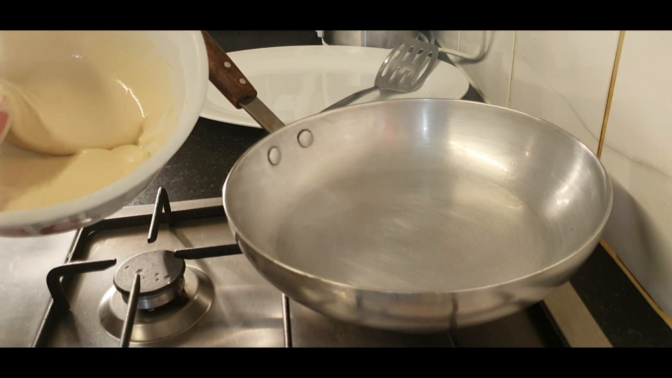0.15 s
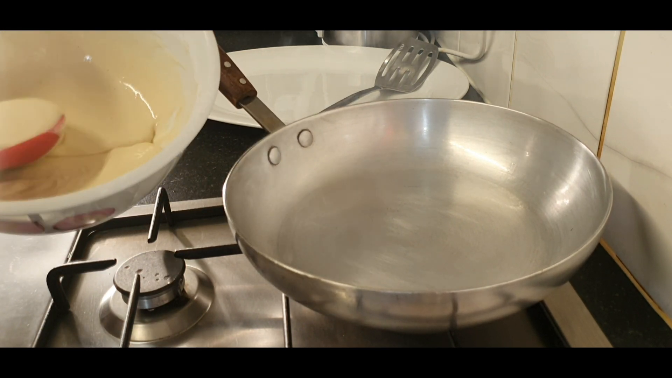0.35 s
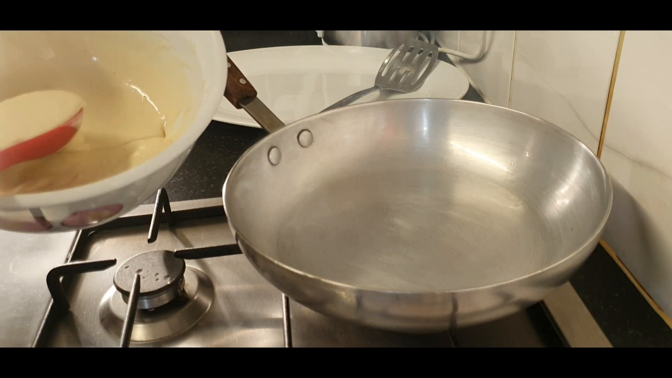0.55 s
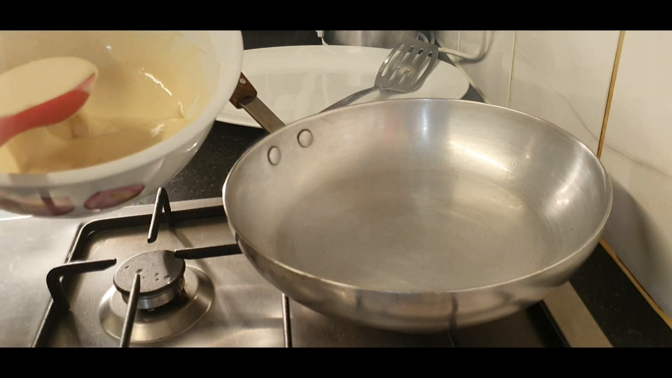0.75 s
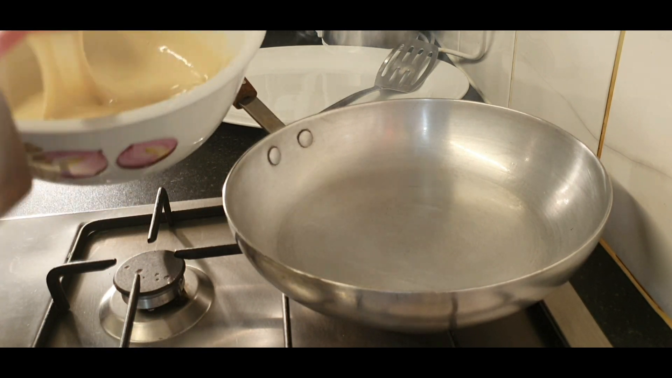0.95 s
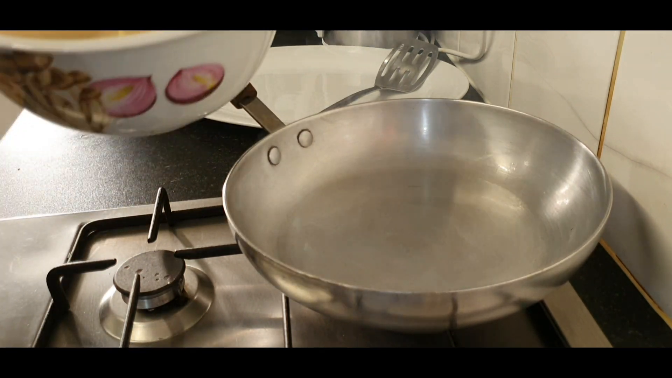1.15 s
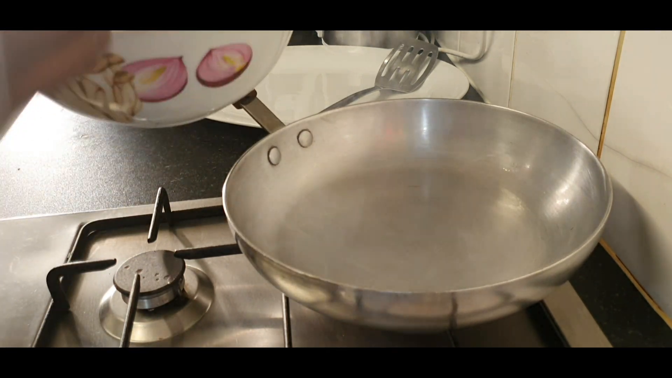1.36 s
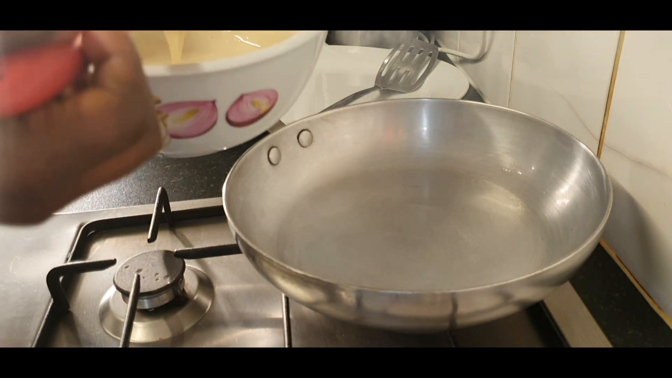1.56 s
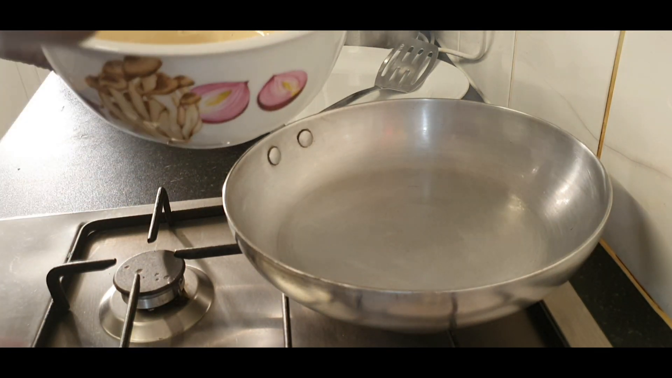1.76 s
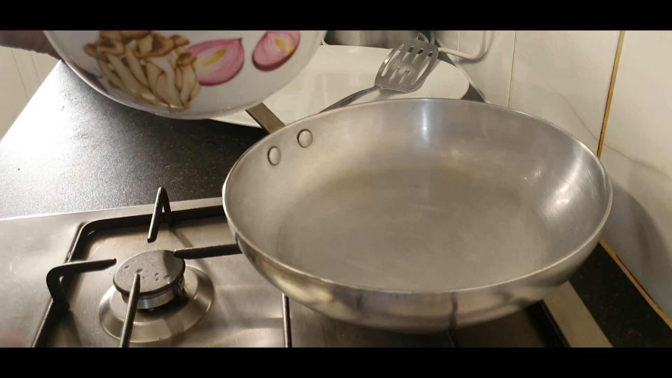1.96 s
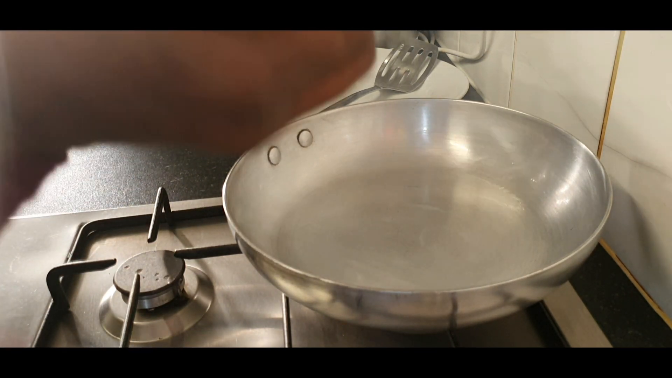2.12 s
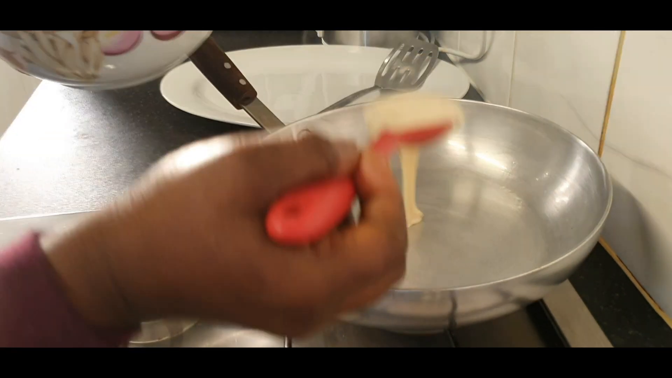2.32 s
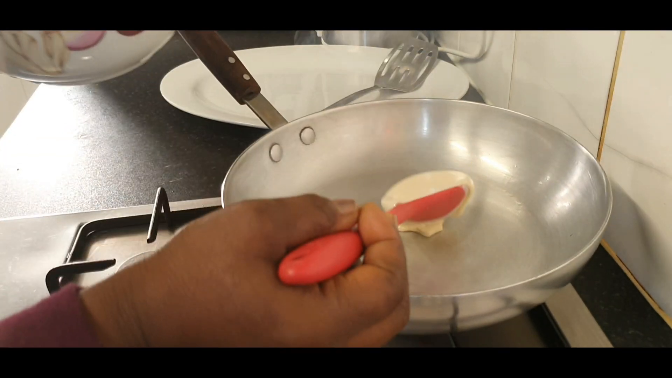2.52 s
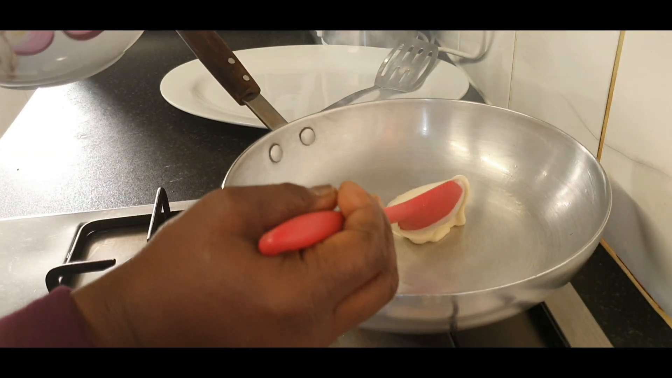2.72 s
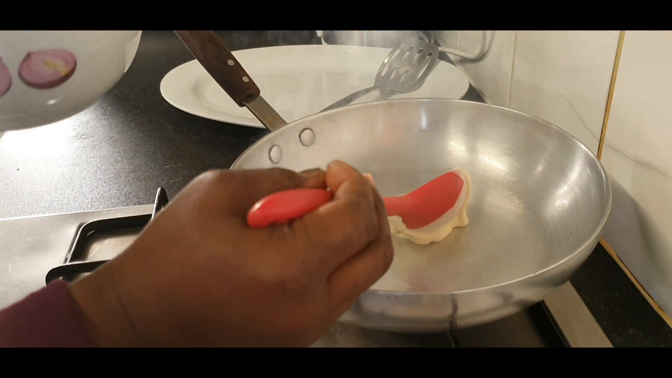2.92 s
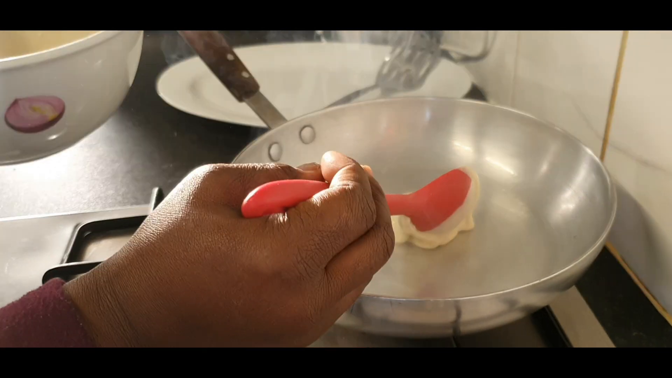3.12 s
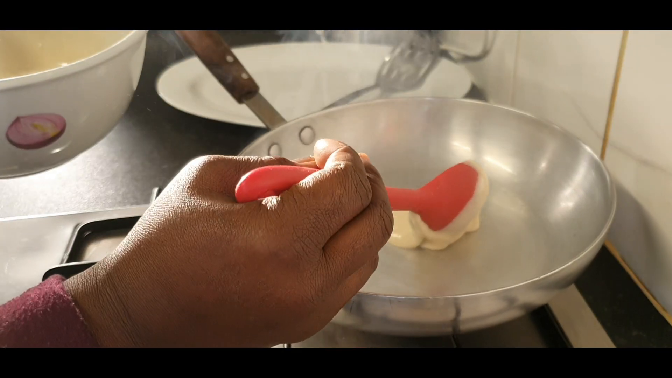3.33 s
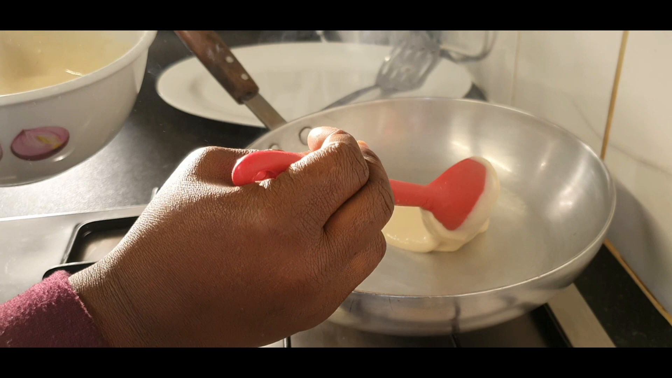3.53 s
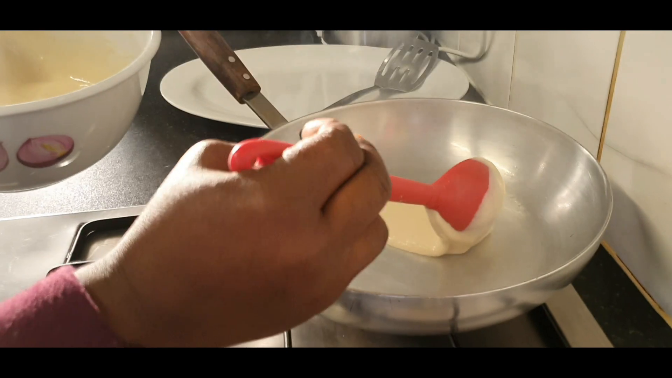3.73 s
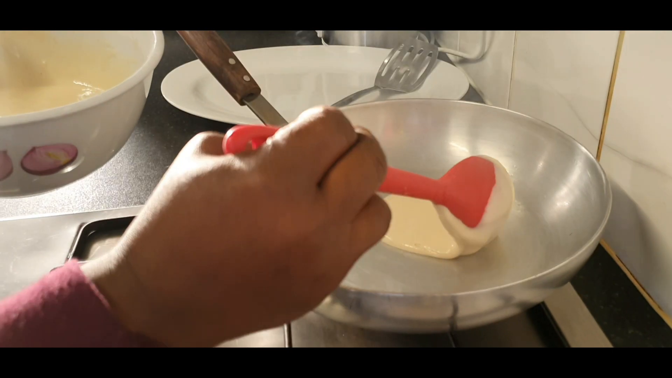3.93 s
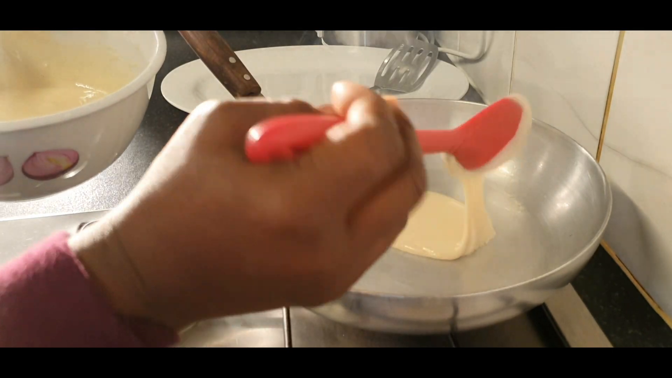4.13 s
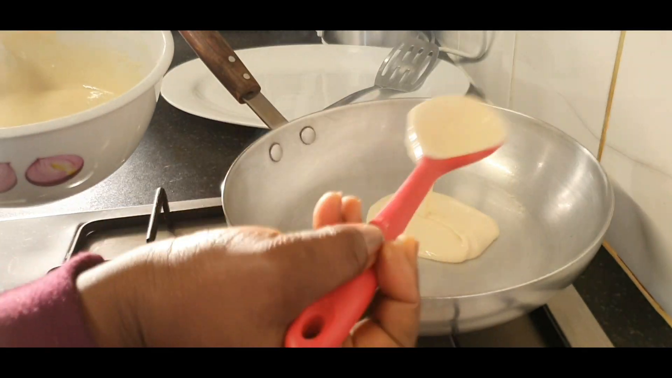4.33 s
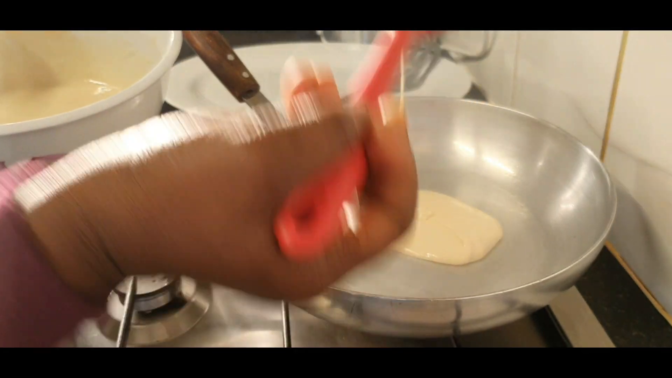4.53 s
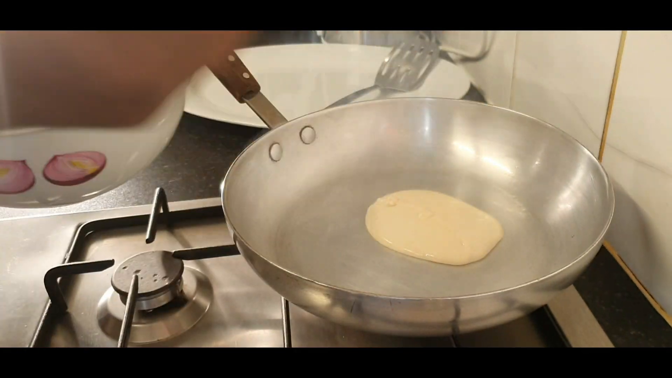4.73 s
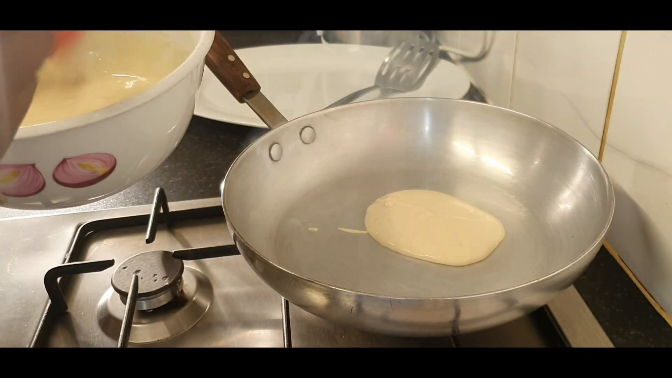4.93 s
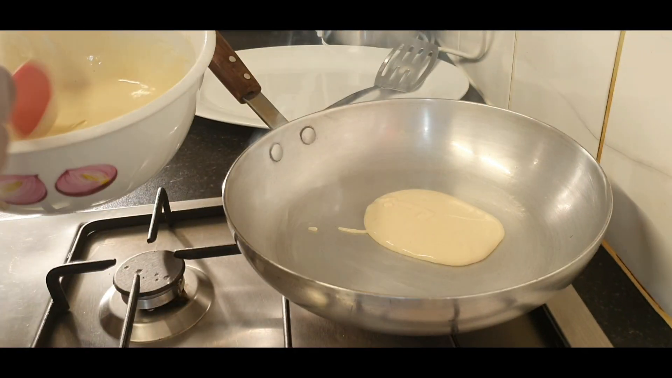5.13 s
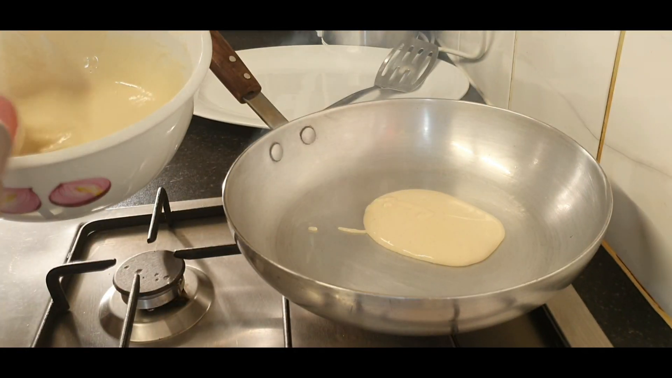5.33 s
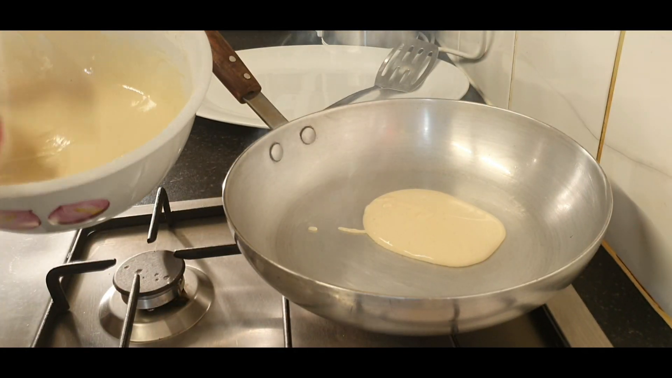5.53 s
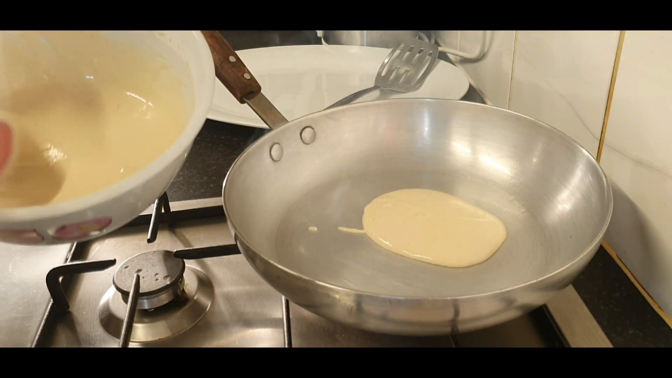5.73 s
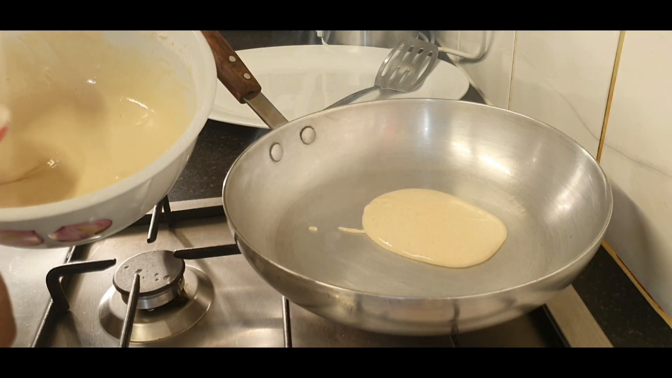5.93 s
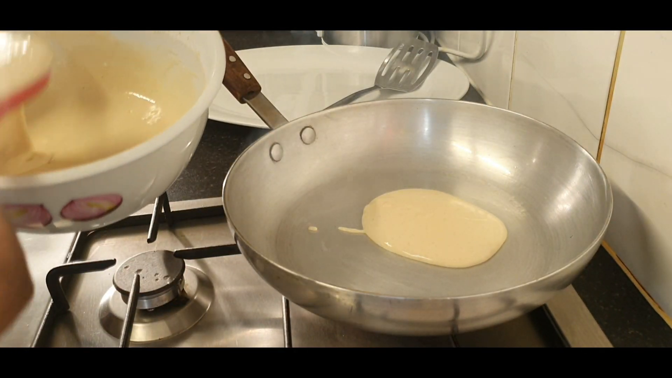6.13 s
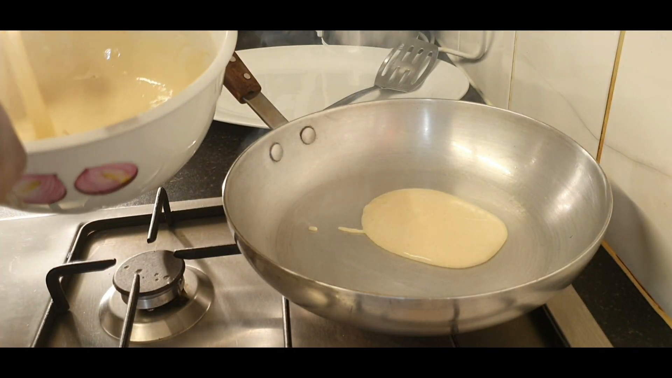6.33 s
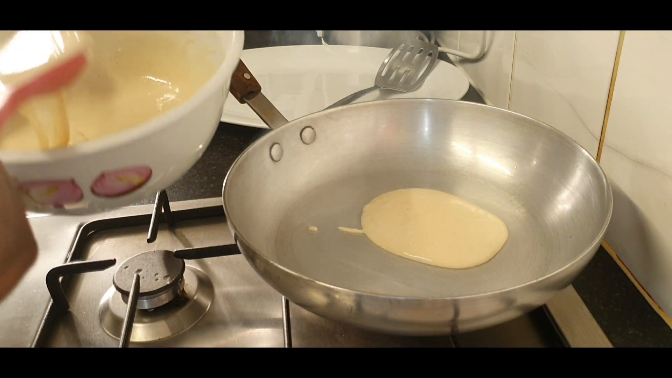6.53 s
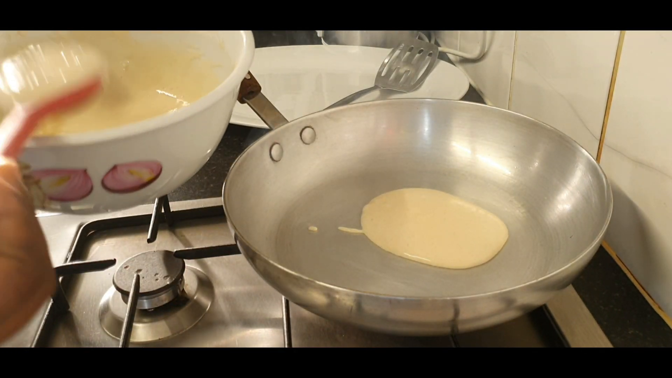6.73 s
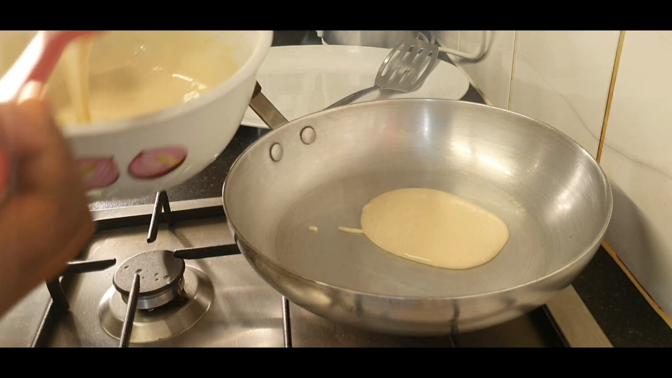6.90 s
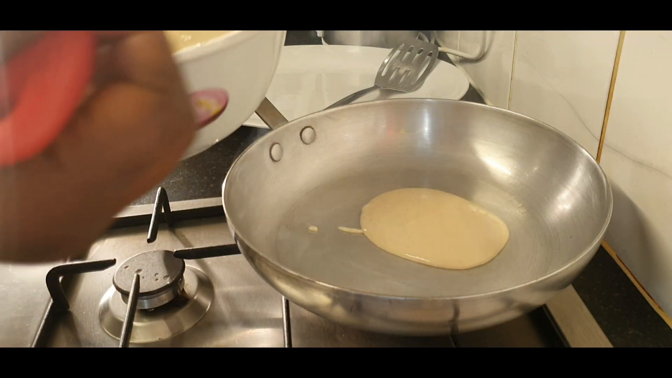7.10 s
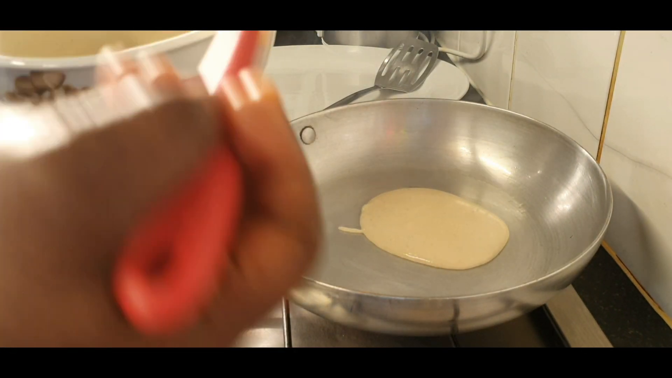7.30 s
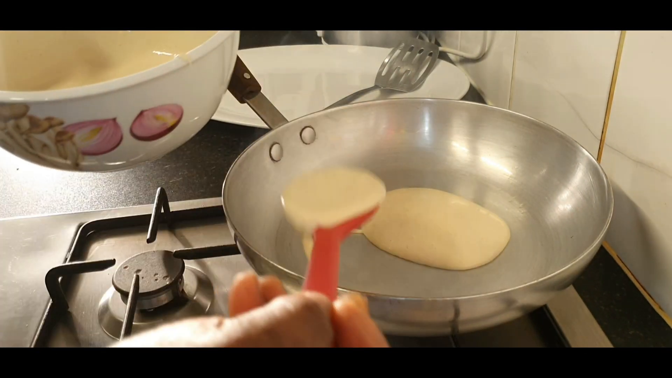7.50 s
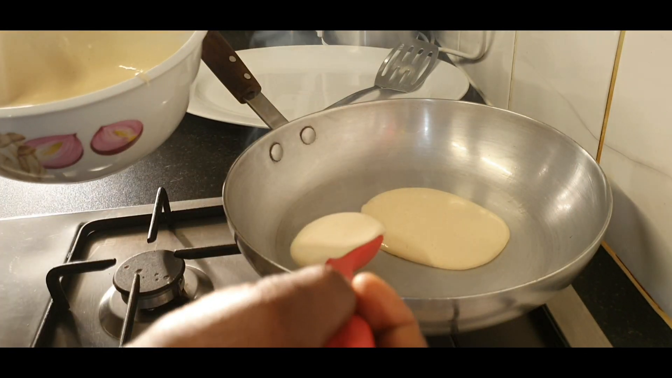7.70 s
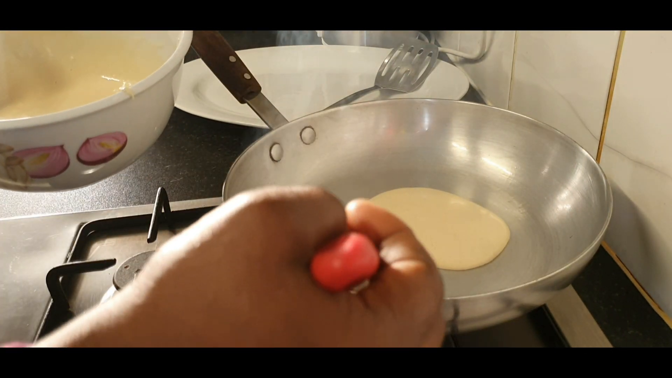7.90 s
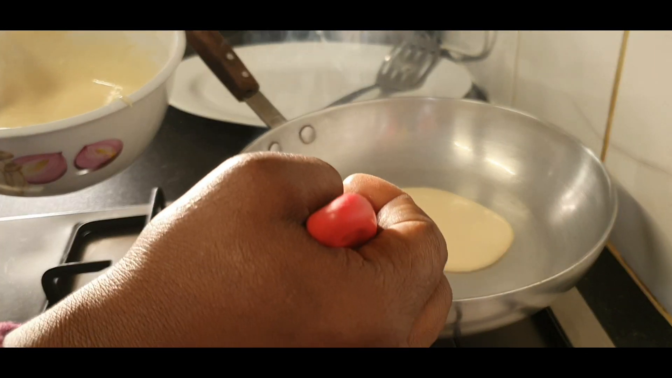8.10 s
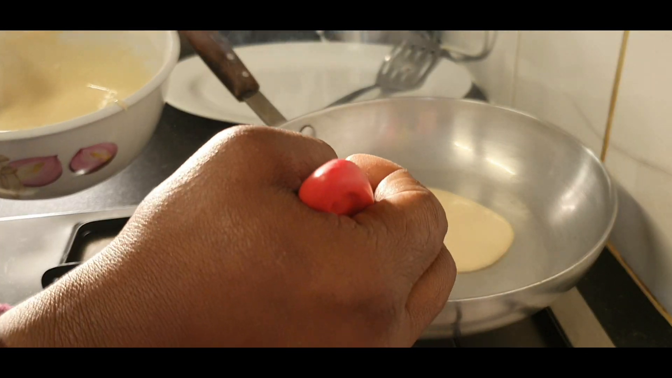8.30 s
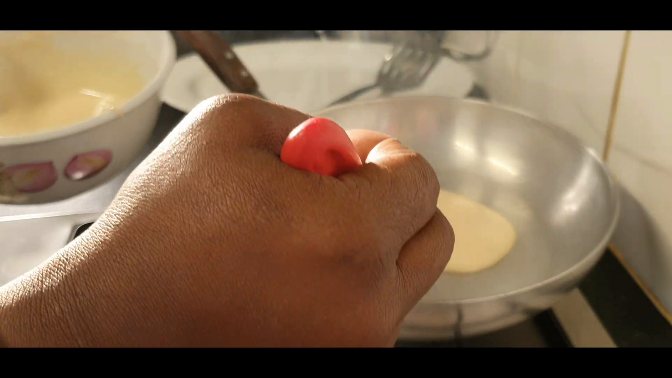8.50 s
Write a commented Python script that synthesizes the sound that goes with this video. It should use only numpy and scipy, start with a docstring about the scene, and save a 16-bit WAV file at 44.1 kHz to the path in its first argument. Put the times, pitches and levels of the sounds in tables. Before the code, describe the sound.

A small kitchen, heard close in stereo with brief wall reflections. A very quiet gas flame murmurs throughout, its low rumble sinking after 7 s. In the first 0.4 s a ladle gives faint clicks and a soft bowl thump. At about 2.33 s it lands on a hot steel pan in a rapid cluster of short metallic knocks, with low grate thuds and a brief gritty scrape until 2.65 s. Batter starts sizzling, swelling by 2.9 s into bright, dense hiss and wet crackle, then calming, with a dip near 4.1 s. Faint dull plops fall from 3.7 to 4.9 s. The ladle bumps the bowl at 5.05 s, clicks at 5.5 and 5.7 s, then makes two deep, muffled, prominent thumps at 6.5 and 6.8 s. At 7.54 s a second pour sizzles, flaring around 7.9-8.1 s before easing towards the end.

```python
"""A gas flame murmurs under a small kitchen: filtered noise that flickers, its bass sinking near the end.
At first a plastic ladle lightly knocks pan and mixing bowl: decaying modes plus short noise clicks.
Then it lands on a hot steel pan, knocks it against its grate and scrapes; the poured batter sizzles,
a crowd of random steam bursts that slowly calms. Dull plops follow, then the ladle bumps the bowl,
through batter and on its bare rim. At last a second pour makes the pan sizzle afresh."""
import sys
import numpy as np
from scipy import signal
from scipy.fft import rfft, irfft
from scipy.io import wavfile

SR = 44100
rng = np.random.default_rng(int(sys.argv[2]) if len(sys.argv) > 2 else 0)


def file_out(sig):
    """Save sig as 16-bit WAV at sys.argv[1]."""
    # one column per channel
    cols = np.atleast_2d(sig).T
    # limit, then scale
    lim = np.clip(cols, -1, 1)
    pcm = np.round(lim * 32767).astype(np.int16)
    wavfile.write(sys.argv[1], SR, pcm)


N = 377319
TIME = np.arange(N) / SR
BLOW_TIME = TIME[:SR * 3 // 4]   # time since a blow [s]
FREQS = np.maximum(np.fft.rfftfreq(N, 1 / SR), 1)


def from_db(db):
    """Decibels to gain."""
    return 10 ** (np.asarray(db) / 20)


def rms_one(x):
    """Scale to unit power."""
    return x / np.sqrt(np.mean(x ** 2) + 1e-20)


def split_db(balance_db):
    """Left and right levels in dB for a left-minus-right difference."""
    return np.array([[.5], [-.5]]) * balance_db


def at_freqs(points):
    """A spectrum table joined by straight lines over log frequency."""
    hz, value = np.transpose(points)
    return np.interp(np.log(FREQS), np.log(hz), value)


def drift(rate_hz):
    """Slow random wander with a spread of about 1, taking new values at the given rate."""
    knots = rng.standard_normal(N // 50)
    wander = np.interp(TIME * rate_hz, np.arange(len(knots)), knots)
    return wander / np.sqrt(2 / 3)   # interpolation had narrowed the spread


def filtered(x, kind, hz, order=2):
    """Causal Butterworth filter."""
    return signal.sosfilt(signal.butter(order, hz, kind, fs=SR, output="sos"), x)


def lowpass(x, hz, order=2):
    """Causal low-pass, kept below the top of the band."""
    return filtered(x, "low", min(hz, .45 * SR), order)


def add(out, s, sound):
    """Mix a short stereo sound in at time s."""
    start = round(s * SR)
    out[:, start:start + sound.shape[-1]] += sound[..., :N - start]


def coloured(pair, spectrum_db):
    """Two unrelated signals become a stereo field of given colour, alike in the bass; mid has rms 1."""
    # likeness of the two sides: (frequency [Hz], left-right correlation [-1 to 1])
    side_likeness = [(100, 0.93), (300, 0.7), (600, 0.38), (1500, 0.17), (4000, 0.14), (8000, 0.041),
                     (15000, 0)]
    alike = np.clip(at_freqs(side_likeness), -.99, .99)
    mid, side = rfft(pair)
    shared = np.sqrt(1 + alike) * mid
    opposed = np.sqrt(1 - alike) * side * [[1], [-1]]
    field = irfft((shared + opposed) * from_db(spectrum_db), N)
    return field / np.std(field.mean(axis=0))


def crack(t60):
    """Stereo noise that dies away: a crowd of modes or reflections."""
    return rng.standard_normal((2, len(BLOW_TIME))) * from_db(-60 * BLOW_TIME / t60)


def click(hz, t60, width):
    """A brief band of decaying noise, as from a hard contact; unit level over its first 5 ms."""
    edges = np.clip([hz / (1 + width), hz * (1 + width)], 20, .45 * SR)
    snap = filtered(crack(t60), "band", edges)
    return snap / np.std(snap[:, :SR // 200])


def ringing(modes, rise_s, spread, uneven=False):
    """One blow on a body; modes reach the two sides out of phase, and an uneven blow favours them by chance."""
    hz, db, t60 = np.transpose(modes)[:, :, None]
    chance_db = uneven * 2 * rng.standard_normal(hz.shape)
    strength = from_db(db + chance_db - 60 * BLOW_TIME / t60)
    skew = spread * (-1) ** np.arange(len(hz))[:, None]   # radians, alternating from mode to mode
    phase = 2 * np.pi * hz * BLOW_TIME
    sides = [(strength * np.sin(phase + sign * skew)).sum(axis=0) for sign in (1, -1)]
    return np.array(sides) * (1 - np.exp(-BLOW_TIME / rise_s))


def bursts(per_s, size_db):
    """Single-sample pops at random times, most tiny and a few large."""
    sizes = from_db(size_db * np.minimum(rng.exponential(1, (2, N)), 5))
    signs = rng.choice([-1, 1], (2, N))
    return sizes * signs * (rng.random((2, N)) < per_s / SR)


def flame(murmur_db, flicker_db):
    """The gas ring is noise: a murmur over a bass rumble that holds, then sinks; both flicker slightly."""
    # colour of the flame's murmur: (frequency [Hz], level [dB])
    murmur_colour = [(150, -5), (240, 2.5), (330, 3.5), (470, -10), (780, 2), (950, -2.5), (1250, -0.5),
                     (1700, -9.5), (2200, -20), (3000, -15.5), (4200, -25), (8200, -25.5), (9200, -38),
                     (15000, -33)]
    # colour of its bass rumble: (frequency [Hz], level [dB])
    rumble_colour = [(20, -16), (40, -30), (52, 9), (80, -4.5), (120, -9), (200, -16), (500, -49.5)]
    rumble_start_db, sinks_from_s, sink_db_per_s = -67.5, 7, 6
    murmur = from_db(murmur_db) * coloured(rng.standard_normal((2, N)), at_freqs(murmur_colour))
    rumble_db = rumble_start_db - sink_db_per_s * np.maximum(TIME - sinks_from_s, 0)
    rumble = from_db(rumble_db) * coloured(rng.standard_normal((2, N)), at_freqs(rumble_colour))
    return (murmur + rumble) * from_db(flicker_db * drift(6.8))


def kitchen(x, tail_db, t60, dull_hz, echo_top_hz, tail_bottom_hz):
    """Long waves come back as distinct wall echoes; shorter ones scatter into a brief tail."""
    # echoes off nearby walls: (delay [s], level [dB])
    wall_echoes = [(.011, -5.5), (.0191, -15), (.0386, -15), (.09, -26)]
    tail = lowpass(crack(t60), dull_hz, order=1)
    tail = tail * (1 - np.exp(-BLOW_TIME / 0.0032))   # the tail builds up within milliseconds
    tail = filtered(tail, "high", tail_bottom_hz)
    tail = from_db(tail_db) * tail / np.sqrt(np.sum(tail ** 2) / 2)
    walls = np.zeros_like(tail)
    for delay, db in wall_echoes:
        add(walls, delay, from_db([db]))
    response = tail + lowpass(walls, echo_top_hz, order=1)
    return x + signal.fftconvolve(x, response, axes=1)[:, :N]


def bowl_knocks(thump_balance_db, click_t60, click_width):
    """Through the batter the ladle only thumps the bowl; on the bare rim it clicks and rings."""
    # thumps through the batter: (time [s], level [dB], contact brightness [Hz])
    batter_thumps = [(.135, -31, 210), (5.886, -29, 380), (6.534, -8, 407), (6.8093, -7.5, 416)]
    # knocks on the bare rim: (time [s], ring level [dB], click level [dB], contact brightness [Hz])
    rim_hits = [(0.042, -66, -45, 5500), (.347, -82, -62.5, 4670), (5.047, -46, -70, 320),
                (5.494, -39.5, -42.5, 3400), (5.704, -42.5, -34, 2580), (5.7164, -36, -30.5, 4640)]
    # modes of the full bowl, the main, heavily damped one first: (frequency [Hz], level [dB], t60 [s])
    full_bowl_modes = [(302, 0, .052), (262, -25, .17), (372, -15, .07), (436, -24, .11), (522, -22, .11),
                       (694, -31, .14), (1080, -28, .05), (1295, -15, .06), (2400, -12, .06)]
    # modes of rim and wall, undamped by batter: (frequency [Hz], level [dB], t60 [s])
    bare_rim_modes = [(120, -12.5, 0.18), (247.2, -2.5, .17), (321, -3, .11), (403, -2, .11), (492, -3, .1),
                      (703, -7.5, 0.14), (763, -8.5, .13), (1080, -5.5, 0.067), (1415, -12, 0.065),
                      (2456, -6.5, .05), (2970, -1.5, .05)]
    out = np.zeros((2, N))
    for s, thump_db, bright_hz in batter_thumps:
        thump = lowpass(ringing(full_bowl_modes, rise_s=0.0096, spread=0.11), bright_hz)
        add(out, s, from_db(thump_db + split_db(thump_balance_db)) * thump)
    for s, ring_db, click_db, bright_hz in rim_hits:
        ring = from_db(ring_db) * lowpass(ringing(bare_rim_modes, rise_s=.002, spread=0.25), bright_hz)
        tick = from_db(click_db) * click(bright_hz, click_t60, click_width)
        add(out, s, ring + tick)
    return out


def plops(hz, t60, width):
    """Blobs of batter plop off the ladle into the pan, each a short, dull burst of noise."""
    # falling blobs: (time [s], level [dB])
    batter_blobs = [(3.724, -55), (4.272, -55.5), (4.503, -58), (4.875, -59)]
    out = np.zeros((2, N))
    for s, db in batter_blobs:
        add(out, s, from_db(db) * click(hz, t60, width))
    return out


def scrape(slips_per_s, pitch_hz, width):
    """After landing the ladle sticks and slips over the steel: a scatter of tiny clicks."""
    start_s, attack_s, hold_s, release_s, level_db = 2.37, 0.022, .19, 0.069, -47
    slips = bursts(slips_per_s, size_db=5.0)[:1]
    grains = signal.fftconvolve(slips, click(pitch_hz, 0.042, width), axes=1)[:, :N]
    corners_s = start_s + np.cumsum([0, attack_s, hold_s, release_s])
    return rms_one(grains) * from_db(level_db) * np.interp(TIME, corners_s, [0, 1, 1, 0])


def pan_knocks(click_t60, click_width):
    """The ladle lands and bounces: the pan rings, damped by batter, and thuds on its grate."""
    # ladle on pan: (time [s], strength [dB], contact brightness [Hz], thud into the grate [dB])
    pan_hits = [(0, -56, 4400, -59), (2.3336, -34, 2540, -52), (2.360, -28.5, 1980, -34),
                (2.375, -33, 2700, -34), (2.391, -35.5, 800, -36), (2.421, -50, 4000, -41.5),
                (2.470, -48, 2800, -45), (2.568, -45.5, 3500, -61), (2.644, -47, 3000, -74)]
    # modes of the steel pan: (frequency [Hz], level [dB] before chance, t60 [s])
    pan_modes = [(248.5, -9.5, 0.077), (649, -4.5, 0.096), (683, -5, 0.15), (1105, -12, 0.23),
                 (1235, -11.5, 0.2), (1240, -23, 0.3), (1420, -12.5, 0.089), (1520, 1.5, 0.033),
                 (1570, -15, 0.042), (1630, 5.5, 0.029), (1840, -20, 0.036), (1743, -4.5, 0.06),
                 (2400, -25, 0.072), (2550, -33, 0.021), (2484, 10, 0.024), (3240, -2, 0.072),
                 (3420, -11, 0.092), (4400, -2, 0.08)]
    # modes of the grate: (frequency [Hz], level [dB], t60 [s])
    grate_modes = [(42.7, 2, 0.38), (54.3, -9.5, 0.85), (89, 2, 0.34), (157, 0, 0.14), (230, 3.5, 0.1)]
    # lighter contacts mostly click: below a firm blow the ring loses extra dB per dB
    firm_blow_db, ring_loss = -33, .35
    # the click lies below the contact's brightness, and a harder contact clicks more
    click_pitch_share, base_click_db, hard_contact_hz, click_db_per_octave = .7, 1, 2670, 12
    out = np.zeros((2, N))
    for s, strength_db, bright_hz, thud_db in pan_hits:
        ring_db = ring_loss * min(strength_db - firm_blow_db, 0)
        steel = lowpass(ringing(pan_modes, rise_s=0.0012, spread=0.43, uneven=True), bright_hz)
        click_db = base_click_db + click_db_per_octave * np.log2(bright_hz / hard_contact_hz)
        tick = from_db(click_db) * click(click_pitch_share * bright_hz, click_t60, click_width)
        contact = from_db(strength_db) * (from_db(ring_db) * steel + tick)
        thud = from_db(thud_db) * ringing(grate_modes, rise_s=0.005, spread=0.097)
        add(out, s, (contact + thud) * from_db(split_db(-.3)))
    return out


def pan_walls(bounce_db, t60):
    """Sound bounces between the steel walls, which ripples its spectrum; in dB per side."""
    bounces = crack(t60)
    bounces = from_db(bounce_db) * bounces / np.sqrt(np.sum(bounces ** 2) / 2)
    return 20 * np.log10(np.abs(1 + rfft(bounces, N)) + 1e-6)


def boiling(wettings):
    """Each patch of batter flares as it spreads, then calms; the patches add up to gains of hiss and sizzle."""
    wet_calms_faster = 1.34   # the wet sizzle dries up this much faster than the hiss
    power = np.zeros((2, N))
    for s, spread_s, hiss_db, sizzle_db, calm_db_per_s in wettings:
        wetted = np.clip((TIME - s) / spread_s, 0, 1)
        calmed_db = calm_db_per_s * np.maximum(TIME - s - spread_s, 0)
        levels_db = [hiss_db - calmed_db, sizzle_db - wet_calms_faster * calmed_db]
        power += (wetted * from_db(levels_db)) ** 2
    return np.sqrt(power)


def lulls():
    """Gains of hiss and sizzle: the frying dips briefly twice, then drops a step and stays lower."""
    # brief dips: (time of lowest point [s], level [dB])
    brief_dips = [(3.24, -1), (4.135, -8)]
    fall_s, recover_s = 0.16, 0.11
    hush_s, hush_takes_s, hush_hiss_db, hush_sizzle_db = 5.67, 0.072, -3.5, -0.5
    dips_db = sum(np.interp(TIME, [s - fall_s, s, s + recover_s], [0, db, 0]) for s, db in brief_dips)
    hushed = np.clip((TIME - hush_s) / hush_takes_s, 0, 1)
    return from_db([dips_db + hush_hiss_db * hushed, dips_db + hush_sizzle_db * hushed])


def frying(sputter_db, sputter_rate_hz):
    """Steam bursts from batter on hot steel, coloured by the pan; the second pour boils at another spot."""
    # batter meets steel: (time [s], spreading time [s], fine steam hiss [dB],
    # coarse wet sizzle [dB], calming of the hiss [dB/s])
    batter_patches = [(2.29, .008, -59.5, -61.5, 1), (2.335, 0.089, -51.5, -52, 2),
                      (2.61, 0.068, -44, -50.5, 1.7), (2.87, 0.027, -43, -50, 3),
                      (3.25, 0.029, -49, -49, 9), (4.86, 0.016, -55, -53, 25),
                      (7.543, 0.0075, -50.5, -48.5, 11), (7.81, .11, -41, -43, 68),
                      (7.99, 0.12, -40.5, -45.5, 12.5)]
    # colour of the smallest bursts: (frequency [Hz], level [dB])
    hiss_colour = [(2500, -35), (5000, -9), (7500, -7), (9500, -6.5), (10800, -1), (13000, -1), (15800, -2)]
    # colour of the larger, wetter bursts: (frequency [Hz], level [dB])
    sizzle_colour = [(300, -33), (500, -22), (750, -9), (1000, -18), (1700, -11.5), (2200, -7), (2900, 0),
                     (5000, 0), (7500, -2), (10000, -8.5), (15000, -13)]
    # resonances of the open pan: (frequency [Hz], width [Hz], lift at first pour [dB],
    # lift at second pour [dB], left minus right [dB])
    pan_hollow = [(1224, 47, 12, 14, 4.5), (1364, 56, 5, 11, -8), (1720, 150, 11.5, 8.5, -2.5),
                  (2090, 960, 0, 3, 1.5), (2796, 78, 1, -2.5, 15.5), (2900, 430, -0.5, 5, -1.5),
                  (3450, 220, 1.5, -0.5, -2), (4310, 190, 2, 1.5, -5), (8190, 1360, 4.5, 3, 6.5),
                  (10950, 2300, -1.5, -1, -5.5)]
    second_pour_s = 7.5
    first = boiling([row for row in batter_patches if row[0] < second_pour_s]) * lulls()
    second = boiling([row for row in batter_patches if row[0] >= second_pour_s])
    out = np.zeros((2, N))
    for pour, (hiss_gain, sizzle_gain) in enumerate([first, second]):
        pan_db = pan_walls(bounce_db=-10, t60=.04)
        for hz, width, *lifts, balance in pan_hollow:
            peak = 1 / (1 + (2 * (FREQS - hz) / width) ** 2)
            pan_db = pan_db + (lifts[pour] + split_db(balance)) * peak
        hiss = coloured(bursts(per_s=20000, size_db=2.5), at_freqs(hiss_colour) + pan_db)
        sizzle = coloured(bursts(per_s=11000, size_db=1.5), at_freqs(sizzle_colour) + pan_db)
        out += hiss * hiss_gain + sizzle * sizzle_gain
    return out * from_db(sputter_db * drift(sputter_rate_hz))   # bursts come in uneven flurries


def scene():
    """Flame and frying are mixed with the ladle and plops, which alone sound through the room."""
    gas = flame(murmur_db=-70.5, flicker_db=0.16)
    ladle = bowl_knocks(thump_balance_db=-5.0, click_t60=0.036, click_width=0.63)
    ladle = ladle + plops(hz=790, t60=.05, width=.4)
    ladle = ladle + scrape(slips_per_s=300, pitch_hz=3000, width=0.41)
    ladle = ladle + pan_knocks(click_t60=0.047, click_width=0.37)
    room = kitchen(ladle, tail_db=-10.0, t60=0.33, dull_hz=6950, echo_top_hz=1180, tail_bottom_hz=503)
    return gas + room + frying(sputter_db=0.86, sputter_rate_hz=49)


def record(dry):
    """A steep elliptic low-pass cuts the top of the treble."""
    cutoff_hz = 15780
    return signal.sosfilt(signal.ellip(12, .1, 70, cutoff_hz, fs=SR, output="sos"), dry)


dry = scene()
out = record(dry)
file_out(out)
```